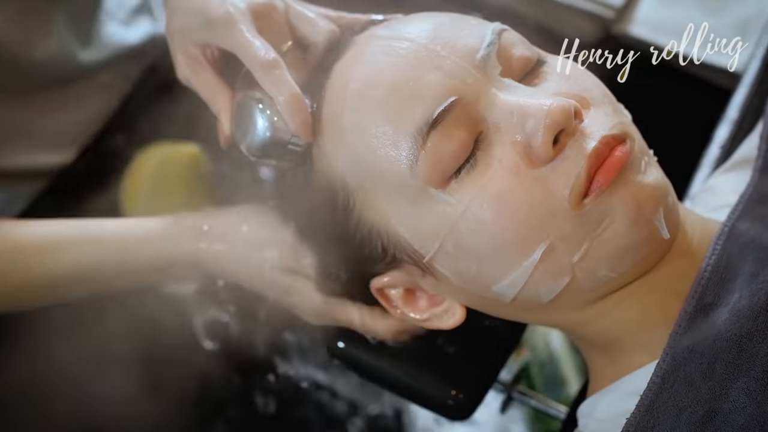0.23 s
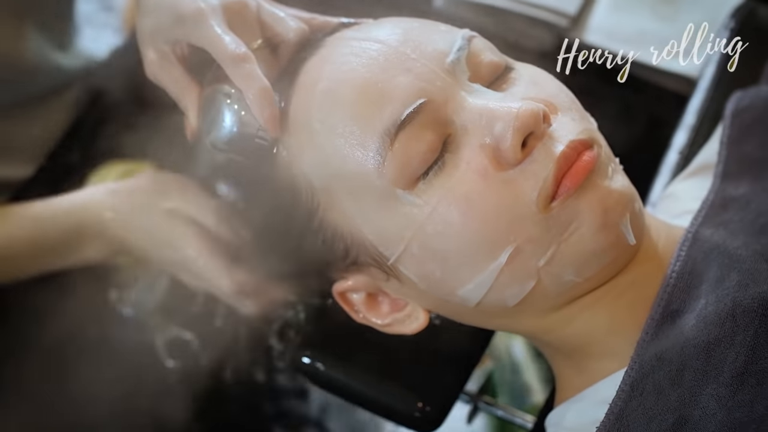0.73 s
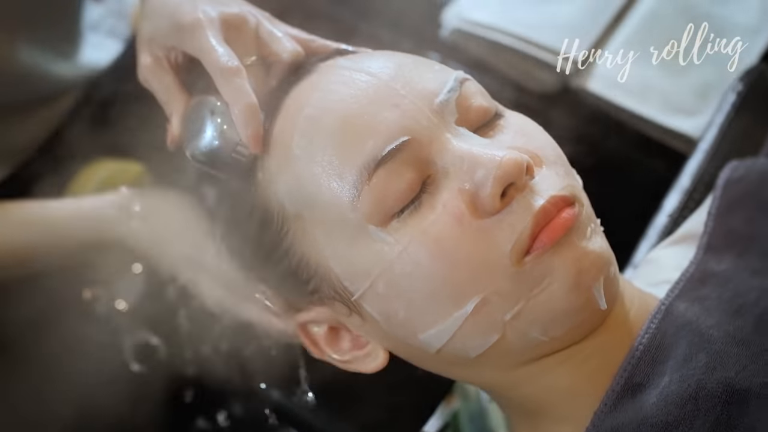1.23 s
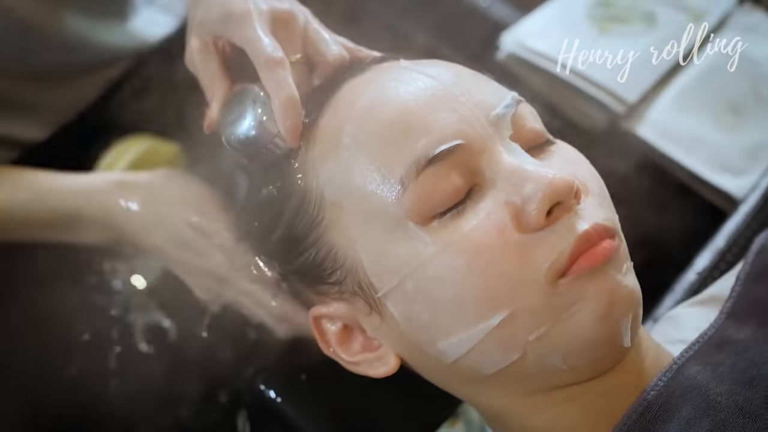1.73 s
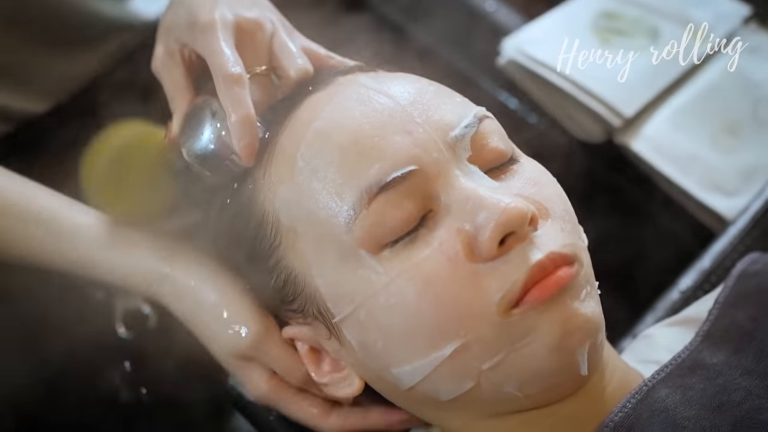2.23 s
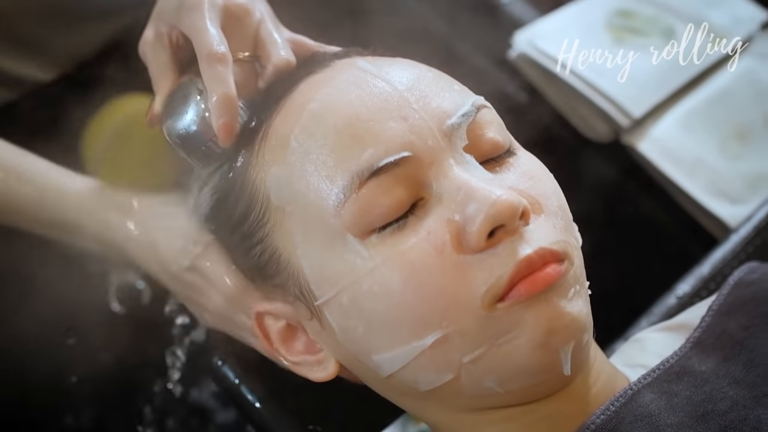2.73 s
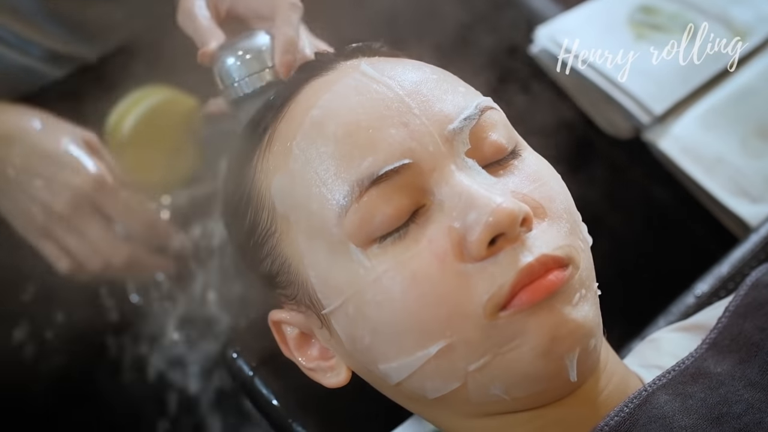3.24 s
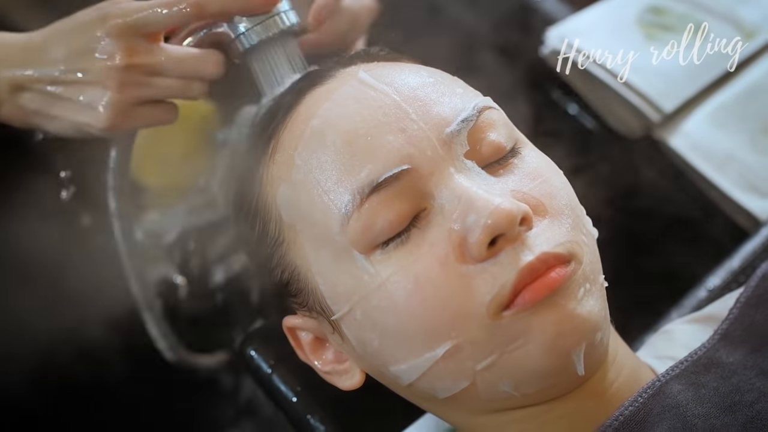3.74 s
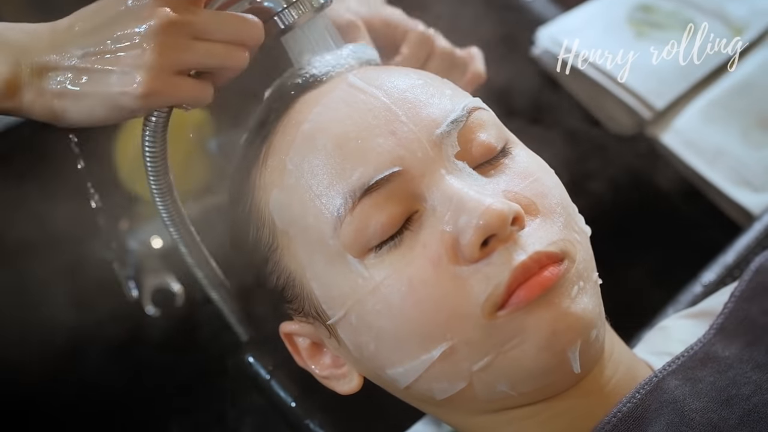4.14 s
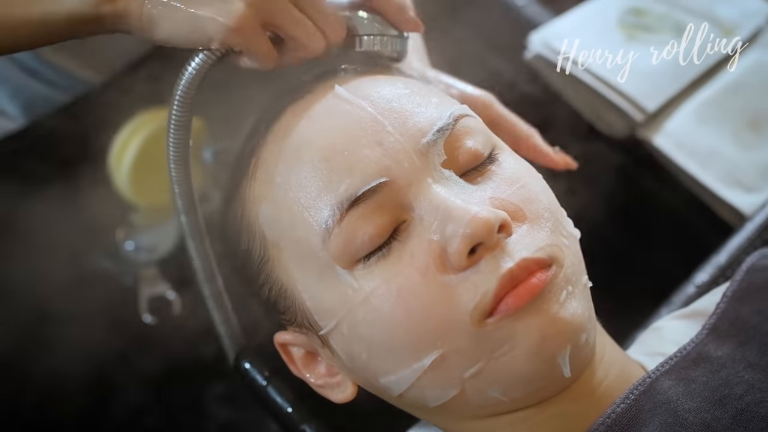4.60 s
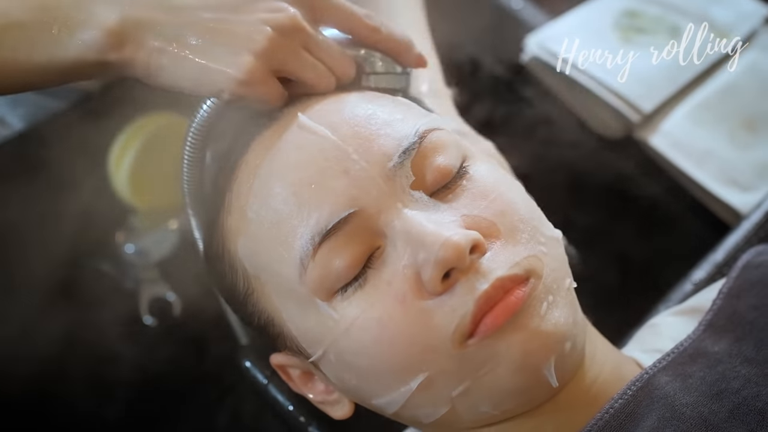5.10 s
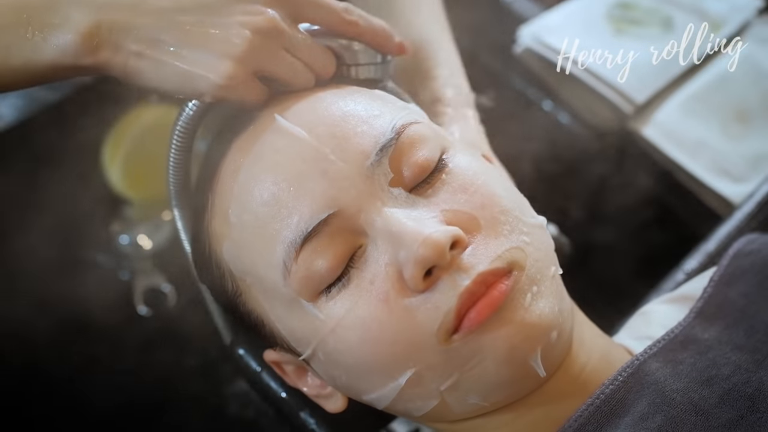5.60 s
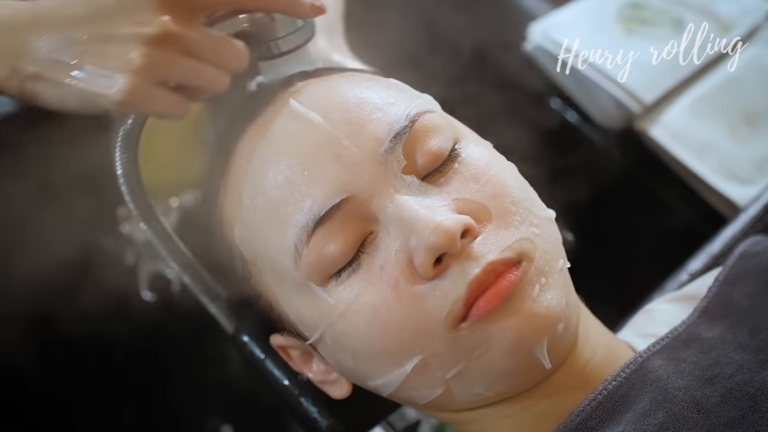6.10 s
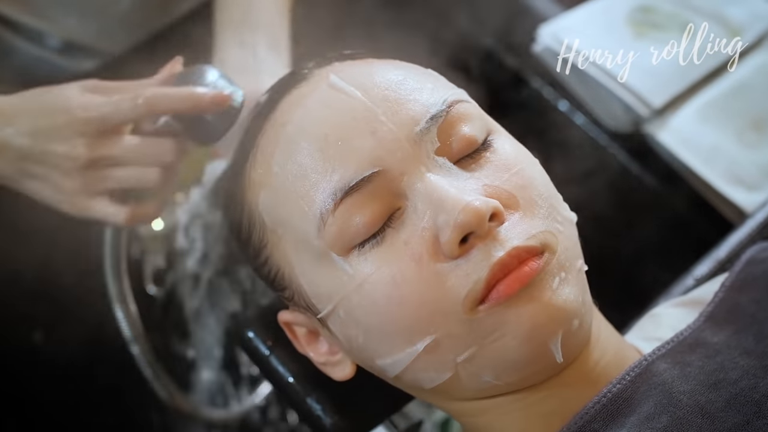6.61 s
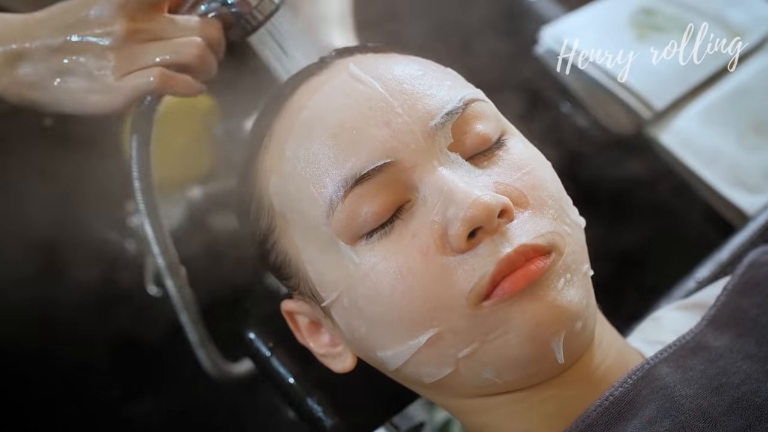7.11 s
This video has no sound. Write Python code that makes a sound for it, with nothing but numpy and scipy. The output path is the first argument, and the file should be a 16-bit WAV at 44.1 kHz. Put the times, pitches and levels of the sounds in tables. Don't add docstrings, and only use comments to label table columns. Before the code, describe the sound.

Close stereo, light bass, short hollow ceramic echo. From 0 to 2.7 s a shower head pressed to wet hair hisses softly; a hand scoops repeated splashes, with clumped trickles, tiny ticks and bright ringing drips. Run-off drums the bowl, and low watery slaps hit the drain around 0.5-0.8 and 1.55 s. From 2.8 s the head lifts, and by 3.3 s the spray is much louder, wide and misty, masking the trickle. A heavy plop falls near 3.75 s; bubbles fizz around 4.2 s and the rush peaks near 4.5 s. At 4.8-5 s it is smothered closer to the hair, flutters with a dip at 5.5 s, then surges with a wet squelch near 5.8 s. From 6.2 s it eases; strong gurgles and drops come at 6.5-7.1 s, and the spray swells again to the end at about 7.3 s.

```python
import sys
import numpy as np
from scipy import signal
from scipy.fft import rfft, irfft, next_fast_len
from scipy.io import wavfile
from scipy.ndimage import uniform_filter1d, map_coordinates

SR = 44100
rng = np.random.default_rng(int(sys.argv[2]) if len(sys.argv) > 2 else 0)


def put_to_file(sound):
    columns = np.atleast_2d(sound).T
    safe = np.clip(columns, -1, 1)
    whole_steps = np.round(safe * 32767)
    wavfile.write(sys.argv[1], SR, whole_steps.astype(np.int16))


def decibels_to_gain(level_db):
    exponent = np.asarray(level_db, float) / 20
    return 10 ** exponent


N = 324135
MIDDLE_DB = -28


def unit(x):
    return x / np.sqrt(np.mean(x ** 2) + 1e-20)


def along(points, hz):
    f, v = np.transpose(points)
    return np.interp(np.log(hz + 1), np.log(f + 1), v)


def curves(rows):
    s, *columns = np.transpose(rows)
    return [np.interp(np.arange(N) / SR, s, column) for column in columns]


def swells(rows, rise):
    t = np.arange(N) / SR
    total = 0
    for s, length, db in rows:
        corners = [s - rise * length, s, s + (1 - rise) * length]
        total = total + db * np.sin(np.interp(t, corners, [0, np.pi / 2, 0]))
    return total


def wobble(rate):
    knots = rng.standard_normal(int(N * rate / SR) + 4)
    return map_coordinates(knots, [np.arange(N) * rate / SR])


def filtered(x, response):
    m = next_fast_len(N + 8192)
    return irfft(rfft(x, m) * response(np.fft.rfftfreq(m, 1 / SR)), m)[..., :N]


def coloured(x, spectrum):
    return unit(filtered(x, lambda hz: decibels_to_gain(along(spectrum, hz))))


def patchy(x, depth_db, block):
    z = signal.stft(x, nperseg=block)[2]
    field = rng.standard_normal(z.shape[1:])
    field = uniform_filter1d(uniform_filter1d(field, size=5, axis=0), size=8, axis=1)
    return signal.istft(z * decibels_to_gain(depth_db * unit(field)), nperseg=block)[1][:, :N]


def patter(patchy_db, scatter_db):
    hits = rng.standard_normal((2, N)) * decibels_to_gain(scatter_db * rng.standard_normal(N))
    return patchy(hits, patchy_db, block=256)


def ringing(x, modes):
    def response(f):
        total = 0
        for k, (centre, width, db) in enumerate(modes):
            damping = 1j * f * width
            total = total + (-1) ** k * decibels_to_gain(db) * damping / (centre * centre - f * f + damping)
        return total
    return unit(filtered(x, response))


def bubbles(start, hz, size, cycles, rise, length):
    n = np.arange(length)
    turns = hz[:, None] * n / SR
    wave = np.sin(2 * np.pi * turns * (1 + rise * turns / cycles))
    wave = wave * np.exp(-turns / cycles) * (1 - np.exp(-turns))
    at = np.round(start * SR).astype(int)[:, None] + n
    return np.bincount(at.ravel(), (size[:, None] * wave).ravel(), N + length)[:N]


def bursts(s, db, t60):
    n = np.arange(SR // 100)
    puff = rng.standard_normal((len(s), len(n))) * decibels_to_gain(db[:, None] - 60 * n / SR / t60)
    at = np.round(s * SR).astype(int)[:, None] + n
    return np.bincount(at.ravel(), puff.ravel(), N)[:N]


# frequency in Hz, left-right likeness from 0 to 1.
ALIKE = [(60, 0.85), (150, .998), (400, 1), (950, 0.98), (2400, 1), (6000, 0.96), (15000, 0.59)]


def spread(pair):
    turn = lambda hz: np.arccos(np.clip(along(ALIKE, hz), -1, 1)) / 2
    mid, side = filtered(pair, lambda hz: np.array([np.cos(turn(hz)), np.sin(turn(hz))]))
    return np.array([mid + side, mid - side])


# share of the notch pitch, width in Hz.
HOLLOW = [(1, 260), (1, 500), (1.02, 200)]
# time in seconds, notch in Hz, share of spray caught from 0 to 1.
CUPPED = [(0, 2750, 0.8), (.2, 2680, 0.4), (.35, 2780, .8), (.45, 2850, .98), (.58, 2860, .98),
          (.66, 2950, 0.53), (.8, 2820, 0.25), (.95, 2900, 1), (1.15, 2750, 0.9), (1.25, 2900, 0.2),
          (1.45, 2750, 0.9), (2.02, 2870, 0.8), (2.14, 3300, 0.2), (2.22, 2890, 0.1), (3.498, 2630, 0),
          (3.68, 2150, 0.1), (3.75, 2270, 0.12), (4.78, 3280, 0.19), (4.86, 3050, 0.3), (4.96, 2700, 0.8),
          (5.03, 2470, 0), (5.08, 3330, 0.4), (5.19, 3160, 0.4), (5.25, 2030, 0.3), (5.36, 3020, 0),
          (5.48, 3240, 0.1), (5.52, 3180, 0), (5.7, 3270, 0.4), (5.82, 3360, 0.44), (5.95, 3200, 0),
          (6.4, 2880, 0), (6.8, 3180, 0), (6.95, 3200, 0), (7.1, 3000, 0.3), (7.35, 2840, 0)]
# peak time in seconds, length in seconds, level
# change in dB.
COVERS = [(.12, 0.13, 0), (.35, 0.11, 1.5), (.95, .06, -0.5), (1.13, 0.26, 2), (1.45, 0.088, 2),
          (2.05, 0.76, 1.5), (2.23, 0.043, -2), (2.47, 0.078, -2), (4.8, 0.08, -2), (4.86, 0.066, -2.5),
          (5.05, 0.05, -1.5), (5.49, 0.25, -5), (5.69, 0.13, -1), (6.0, 0.081, 1)]
COVER_CLOSE = 0.88


def hollowed(x):
    f, t, z = signal.stft(x, SR, nperseg=1024)
    s, notch_hz, _ = np.transpose(CUPPED)
    pitch, f = np.interp(t, s, notch_hz), f[:, None]
    cover_db = np.interp(t, np.arange(N) / SR, swells(COVERS, COVER_CLOSE))
    wider = 1 + 0.75 * np.abs(cover_db)
    for share, width in HOLLOW:
        detuning = (share * pitch) ** 2 - f * f
        z = z * detuning / (detuning + 1j * f * width * wider + 1)
    return signal.istft(z, SR, nperseg=1024)[1][..., :N]


def trickle(count):
    clump = np.cumsum(decibels_to_gain(6 * wobble(25)))
    pair = []
    for rows in rng.random((2, count, 4)):
        when, pitch, rarity, life = rows.T
        start = np.interp(when, clump / clump[-1], np.arange(N) / SR)
        size = (1 - .99 * rarity) ** -.55
        cycles = (2.5 + 9 * life ** 2.5)[:, None]
        pair.append(bubbles(start, 3400 * 2.06 ** pitch, size, cycles, rise=0.008, length=450))
    return unit(np.array(pair))


# time in seconds, spray level in dB.
SPRAY = [(0, -41.5), (.72, -40), (1.2, -33), (1.65, -34.5), (1.96, -37), (2.68, -34.5), (2.88, -30.5),
         (3.28, -22.5), (3.68, -23.5), (3.76, -20.5), (4.09, -21.5), (4.5, -17.5), (4.75, -19),
         (4.9, -24.5), (5.85, -18), (6.49, -25), (6.88, -25), (7.25, -17.5)]
# time in seconds, jets toward the microphone in dB, jets onto ceramic in dB.
AIM = [(0, -4, 3), (2.68, -4, 3), (2.95, -4, 7), (3.15, 4, 2), (3.3, 4, 1.5), (3.62, 5, -1), (3.88, 5, 3.5),
       (4.08, 2, 4), (4.35, 4.5, -0.5), (4.74, -2, 1), (4.82, -3, -1.5), (5.3, -3, -2), (5.7, 0.5, -0.5),
       (5.83, -3, -1.5), (5.98, 1, -7), (6.25, -2, 1), (6.65, -2, 4.5), (7.05, -0.5, -4), (7.35, 3.5, -1.5)]
# peak time in seconds, length in seconds, splash in dB.
SPLASHES = [(.01, 0.14, 15), (.2, 0.16, 15), (.45, 0.34, 12), (.65, 0.11, 13.5), (.7, 0.074, 0),
            (.78, 0.16, 15.5), (.83, 0.099, 4), (.89, 0.1, 11.5), (1.21, 0.11, 8), (1.33, .12, 6.5),
            (1.56, 0.28, 6.5), (2.18, 0.12, 6.5), (2.25, 0.47, 3), (2.52, 0.12, 5.5), (2.86, 0.36, 4),
            (3.75, 0.096, 3.5), (4.22, 0.32, 1), (4.6, 0.34, 0), (5.1, .08, 3), (5.24, 0.35, 3.5),
            (5.55, 0.11, 3.5), (5.84, 0.33, 4.5), (4.97, 0.15, 3.5), (5.35, 0.071, 2), (6.07, 0.25, 5),
            (6.53, 0.17, 2.5), (7.0, 0.096, 3)]
# frequency in Hz, density in dB per Hz.
HISS = [(2400, -62), (2750, -38), (3050, -9), (3400, -35), (3900, -3), (5000, -1), (6000, -1.5), (7300, -5),
        (9000, -16), (10500, -41), (12000, -60)]
BODY = [(900, -41), (1300, -7), (2000, -1), (2400, 3.5), (3000, 4.5), (3500, 4), (4500, -4), (5500, -50)]
MIST = [(7500, -21), (9000, 5), (10000, 1), (11700, -1.5), (13800, -6), (15600, -12.5), (18000, -30)]


def spray():
    (level_db,), (aim_db, bare_db) = curves(SPRAY), curves(AIM)
    over_db = level_db - MIDDLE_DB
    splash_db, cover_db = swells(SPLASHES, rise=0.33), swells(COVERS, COVER_CLOSE)
    hiss_db = level_db + 0.47 * splash_db + cover_db
    body_db = -39 + 1.27 * over_db + bare_db + splash_db + 1.07 * cover_db
    mist_db = -52.5 + over_db + aim_db + 0.78 * splash_db + 2 * cover_db
    flutter_db = 0.45 * wobble(30) + 0.6 * wobble(60)

    share = 0.056 + 0.35 / (1 + decibels_to_gain(12.5 * (hiss_db + 24.5)))
    jets = coloured(patter(patchy_db=2, scatter_db=2), HISS)
    hiss = decibels_to_gain(hiss_db + 1.0) * (np.sqrt(1 - share) * jets + np.sqrt(share) * trickle(count=4500))
    body_db = body_db + 4.0
    body = decibels_to_gain(body_db) * coloured(patter(patchy_db=2, scatter_db=1.5), BODY)
    mist_db = mist_db + 7.5 + 5 * share * wobble(55)
    mist = decibels_to_gain(mist_db) * coloured(patter(patchy_db=-0.5, scatter_db=5), MIST)

    strong = 1 / (1 + decibels_to_gain(4 * (-40 - (body_db - 4.0))))
    clear = np.clip(1 - curves(CUPPED)[1], 0, 1) * strong
    return decibels_to_gain(flutter_db) * (hollowed(hiss + (1 - clear) * body) + clear * body + mist)


# time in seconds, flow in dB.
RUNOFF = [(0, -0.5), (.3, 1), (.6, -1), (.8, 1.5), (1.7, 2), (1.86, -0.5), (2.03, 3.5), (2.4, 0.5),
          (3.25, 4), (3.9, 1), (4.67, -1.5), (5.26, 1.5), (5.87, -2), (6.65, 0.5), (7.04, -1), (7.35, -0.5)]
# peak time in seconds, length in seconds, swell in dB.
SLOSHES = [(0.02, 0.56, 8.5), (.3, 0.35, 2.5), (.67, 0.13, 8.5), (1.2, 0.18, 5.5), (1.65, 0.3, 2.5),
           (1.96, 0.075, 2), (2.41, 1, 4.5), (3.3, .6, 7), (4.6, 0.24, 1.5), (5.12, 0.096, 6),
           (6.65, 1, 2.5), (7.33, 0.42, 6.5)]
# peak time in seconds, length in seconds, change in dB.
SHEETS = [
    (1.3, 0.7, -1),
    (2.8, .4, 0.5),
    (4.2, .5, 1),
    (5.0, 0.38, 0),
    (5.7, 0.7, -2.5),
    (6.3, .5, -1),
    (6.7, 0.26, -2),
    (7.25, 0.24, 0),
]
# start in seconds, peak in dB,
# pitch in Hz.
SLUGS = [(0.489, -17, 433), (0.626, -8, 283), (0.648, -8, 705), (0.669, -11, 644), (0.689, -11, 645),
         (0.798, -21, 283), (1.539, -13.5, 497), (1.569, -16, 540), (2.877, -11.5, 340),
         (3.335, -12.5, 246), (3.598, -19, 297), (6.597, -17.5, 294), (6.859, -13, 880),
         (0.268, -16, 353), (0.621, -17, 283), (0.727, -17, 640), (0.812, -23, 256), (0.951, -29, 261),
         (1.111, -28, 256), (1.512, -26, 288), (2.291, -23, 285), (3.012, -23, 646), (3.245, -17, 278),
         (4.477, -20, 342), (4.816, -32, 342), (4.929, -24, 310), (5.119, -19, 600), (5.267, -27, 264),
         (5.476, -29, 404), (5.883, -27, 310), (6.597, -20, 291)]
# frequency in Hz, width in Hz, level in dB.
BOWL = [(894.2, 33, -8), (958, 25.5, 3), (997.7, 35.6, 3), (1040.8, 28, 3.5), (1076.5, 21.7, 4),
        (1130.4, 74, -5)]
PIPE = [(190.2, 8.9, -9), (235.5, 11.5, -2), (251.4, 10, 3.5), (283, 18.2, 2), (340, 14.4, 3.5),
        (356.5, 15, 4.5), (433, 48.4, -7)]
RIM = [(1519, 98, 0), (1705, 33, 8.5), (1765, 54.4, 1), (2160, 130, -6.5), (2350, 57, -1),
       (2590, 110, -9.5)]
POOL = [(536, 43, 3.8), (564.3, 25, 13.6), (643, 38, 5.6)]


def basin():
    flow_db, over_db = curves(RUNOFF)[0], curves(SPRAY)[0] - MIDDLE_DB
    bowl_db = -30 + 0.23 * flow_db + 0.079 * swells(GULPS + FIZZES, rise=0.55)
    pipe_db = -37 + flow_db
    rim_db = -32.5 + 0.25 * over_db + 0.11 * swells(FIZZES, rise=0.78) + swells(SHEETS, rise=0.38)
    pool_db = -43 + swells(SLOSHES, rise=0.28)
    out = 0
    for level_db, modes in ((bowl_db, BOWL), (pipe_db, PIPE), (rim_db, RIM), (pool_db, POOL)):
        broad = [(hz, 3 * width, 0) for hz, width, db in modes]
        feed = ringing(patter(patchy_db=1.2, scatter_db=2.0), broad)
        level_db = level_db + 0.26 + 0.49 * wobble(25) + 0.14 * wobble(3.37)
        out = out + decibels_to_gain(level_db) * ringing(feed, modes)
    out = patchy(out, depth_db=2, block=2048)
    s, db, hz = np.transpose(SLUGS)
    out[0] += bubbles(s, hz, decibels_to_gain(db + 0.5), cycles=1.54, rise=0.028, length=3000)
    return out


# peak time in seconds, length in seconds, swell in dB.
GULPS = [(.01, 0.13, 6), (.3, 0.95, 8.5), (0.647, 0.16, 11), (1.995, .4, 8), (2.537, 0.15, 12),
         (2.906, 0.34, -3), (3.55, 0.95, 9), (4.253, 1, 8.5), (4.85, 0.34, -10), (5.51, 0.28, 14),
         (5.82, 0.27, 1), (1.3, 0.33, -3), (2.05, .12, -6), (6.165, 0.28, 19), (6.64, 0.5, 13),
         (6.898, 0.27, 23.5), (7.34, 0.09, 1)]
FIZZES = [(0.243, 0.98, 5), (0.854, 0.16, 14.5), (1.21, 0.27, 11), (2.1, 0.43, 7), (2.485, 0.42, 10),
          (4.242, 0.54, 20.5), (4.8, 0.45, 1), (5.077, 0.34, 9), (6.1, 0.87, 4), (6.655, 0.36, 14),
          (6.953, 0.27, 26), (7.09, 0.19, 28), (7.3, 0.24, -15)]
# peak time in seconds, length in seconds, swell in dB.
SQUELCHES = [
    (3.3, .5, 10),
    (3.76, .1, 16),
    (4.2, .5, 14),
    (4.6, .2, 10),
    (5.25, .2, 8),
    (5.827, 0.14, 25),
    (6.1, .3, 8),
    (6.53, .15, 12),
    (7.2, .3, 10),
]


def gurgle(count):
    gulp_db = -52.5 + swells(GULPS, rise=0.56)
    fizz_db = -55.5 + swells(FIZZES, rise=0.64)
    squelch_db = -58.5 + swells(SQUELCHES, rise=0.32)
    out = 0
    for level_db, low_hz in ((gulp_db, 690), (fizz_db, 1220), (squelch_db, 2100)):
        pops = []
        for when, pitch, size in rng.random((2, 3, count)):
            pops.append(bubbles(when * N / SR, low_hz * 1.4 ** pitch, 0.9 + size, cycles=9, rise=0.03, length=800))
        out = out + decibels_to_gain(level_db + 1.5) * unit(np.array(pops))
    return out


# start in seconds, peak in dB, pitch in Hz.
SPECKS = [(0.0864, -24, 4510), (0.166, -16, 4550), (0.2314, -18, 4300), (0.2744, -22, 4480),
          (0.323, -15, 4190), (0.4464, -20, 5420), (0.469, -14, 5400), (0.586, -17, 7090),
          (0.6674, -27, 4100), (0.7804, -16, 4610), (0.8114, -17, 5050), (0.942, -12, 6060),
          (0.9712, -24, 5540), (0.9904, -29, 6190), (1.0091, -20, 5130), (1.0314, -13, 4970),
          (1.1243, -17, 4370), (1.163, -18, 4310), (1.4234, -25, 5040), (1.498, -12, 3940),
          (1.6164, -15, 6990), (1.7978, -21, 4590), (1.8354, -16, 5990), (1.8886, -13, 5570),
          (1.9874, -30, 4840), (2.0124, -26, 5240), (2.08, -19, 6200), (2.11, -15, 7760),
          (2.141, -15, 6360), (2.166, -20, 5300), (2.2345, -19, 3930), (2.2794, -18, 5200),
          (2.384, -13, 5040), (2.4634, -25, 4390), (2.7284, -20, 5240), (2.785, -20, 5100),
          (4.812, -8, 6600), (5.5029, -8, 4100), (5.6471, -5, 6320), (6.5144, -7, 4200), (6.558, -7, 4300),
          (6.6185, -5, 4100), (6.6564, -11, 3900)]
# start in seconds, peak in dB.
SPITS = [(0.0812, -57), (0.0812, -48), (0.1381, -45), (0.1655, -45), (0.191, -40), (0.2299, -40),
         (0.3047, -48), (0.3436, -51), (0.3985, -44), (0.4359, -48), (0.4489, -47), (0.5447, -50),
         (0.5447, -47), (0.5861, -39), (0.7337, -51), (0.7701, -30), (0.8121, -41), (0.8275, -35),
         (0.8565, -34), (0.8674, -37), (0.8869, -32), (0.9193, -41), (0.9842, -47), (1.1288, -47),
         (1.1513, -42), (1.1623, -42), (1.2376, -47), (1.3049, -40), (1.3209, -39), (1.4262, -45),
         (1.5643, -43), (1.6162, -42), (1.702, -44), (1.7345, -46), (1.7828, -53), (1.7958, -49),
         (1.8657, -49), (1.8876, -49), (1.9185, -45), (1.9909, -50), (2.0033, -44), (2.0123, -36),
         (2.0971, -48), (2.144, -39), (2.168, -31), (2.2463, -38), (2.2618, -34), (2.3176, -47),
         (2.4768, -47), (2.6589, -51), (2.6843, -49), (2.7287, -49), (2.7811, -47), (2.8809, -40),
         (2.9711, -33), (3.1394, -26), (3.2794, -24), (3.3294, -26), (4.812, -25), (5.2024, -21),
              (5.3961, -29), (5.5009, -24), (5.863, -23), (6.5685, -25), (6.8498, -26), (7.2194, -18)]
# frequency in Hz, density in dB per Hz.
SPIT = [(4000, -30), (6500, -2), (9000, 3), (12500, -4), (16000, -14)]


def specks():
    s, db, hz = np.transpose(SPECKS)
    ring = bubbles(s, hz, decibels_to_gain(db - 5.5), cycles=9.7, rise=0.0034, length=300)
    ring = ring + filtered(bursts(s, db, t60=0.016), lambda f: decibels_to_gain(along(HISS, f)))
    s, db = np.transpose(SPITS)
    spits = [filtered(bursts(s, db + 1, t60=.035), lambda f: decibels_to_gain(along(SPIT, f))) for side in (0, 1)]
    return ring * np.array([[1], [0]]) + spits


# start in seconds, peak
# in dB, pitch in Hz, smaller bubble in dB.
SINGLE_DROPS = [(.1391, -30, 4200, -14), (0.1921, -2.5, 3810, -12), (.2104, -22, 4500, -14),
                (.2508, -13, 4300, -22), (0.29, -13.5, 4200, -18), (.306, -12.5, 5050, -11),
                (.3706, -24, 4770, -3), (0.409, -21, 6330, -12), (0.4377, -18, 6500, -7),
                (0.608, -10.5, 6100, -13), (.734, -16, 4300, -17), (0.776, -9, 4470, -18), (.829, -9, 4900, -12),
                (0.8647, -14.5, 4640, -15), (0.93, -16.5, 4900, -6), (1.074, -14, 4200, -9),
                (1.181, -15, 4260, -4), (1.3202, -13.5, 3970, -5), (1.39, -14, 5500, -19), (1.49, -7, 4520, -16),
                (1.5735, -18, 3900, -2), (1.649, -13, 5160, -17), (1.819, -10, 4930, -16), (1.89, -4.5, 5380, -32),
                (2.0426, -16.5, 5600, -7), (2.3275, -7.5, 3980, -28), (2.341, -7.5, 4770, -29),
                (2.3518, -8, 3960, -31), (2.4915, -17, 6060, -3), (2.544, -15.5, 4340, -24),
                (2.6544, -19, 4530, -5), (3.1014, -13, 5100, -13), (3.1842, -11, 4830, -8),
         (3.2362, -8.5, 4330, -10), (3.299, -5, 4500, -15), (3.402, -9, 4900, -14), (3.493, -9.5, 5850, -8),
         (3.7265, -6.5, 3090, -22), (3.7544, -3, 2080, -11), (4.5553, -2, 4940, -22), (4.595, -9, 4540, -2),
         (5.2035, -7.5, 5000, -1), (6.5002, -4, 4140, -26), (6.602, -3, 4470, -14), (6.6453, -4, 3630, -27),
         (6.8427, -11, 4500, -16)]


def drops():
    s, db, hz, small_db = np.transpose(SINGLE_DROPS)
    crack_db = db - 5 + 0.64 * small_db
    late = rng.random((len(s), 4))
    n = np.arange(SR // 200)
    burst = rng.standard_normal((len(s), len(n))) * decibels_to_gain(-60 * n / SR / 0.012)
    at = (np.round(s * SR).astype(int)[:, None] + n).ravel()
    crack = np.bincount(at, (decibels_to_gain(crack_db)[:, None] * burst).ravel(), N)[:N]
    out = np.tile(filtered(crack, lambda f: decibels_to_gain(15 + 1.14 * along(HISS, f))), (2, 1))

    partner_hz = 5700 + 1200 * late[:, 1]
    first_s, first_hz = s + 0.0042 + 0.015 * late[:, 0], hz * (0.9 + .3 * late[:, 1])
    second_s, second_hz = s + 0.0067 + 0.016 * late[:, 2], hz * (1.0 + 0.56 * late[:, 3])
    for side, lean_db in enumerate((-.5, .5)):
        size = decibels_to_gain(db + lean_db)
        partner = 1.05 * size * decibels_to_gain(small_db)
        out[side] += bubbles(s + 0.00031, partner_hz, partner, cycles=12.0, rise=0.017, length=300)
        out[side] += bubbles(s, hz, 1.2 * size, cycles=5.5, rise=0.01, length=400)
        out[side] += bubbles(first_s, first_hz, 0.3 * size, cycles=6, rise=0.01, length=400)
        out[side] += bubbles(second_s, second_hz, 0.25 * size, cycles=6, rise=.01, length=400)

    t = np.arange(SR // 10) / SR
    echo = rng.standard_normal(len(t)) * decibels_to_gain(-60 * t / 0.036) * (t > .0015)
    echo = echo / np.linalg.norm(echo)
    return out + decibels_to_gain(-9) * signal.fftconvolve(out, echo[None], axes=1)[:, :N]


# time in seconds, left minus right in dB.
LEAN = [(0.0, -1.0), (6.2, -1), (6.84, -0.5), (7.35, -1)]


def scene():
    lean_db, = curves(LEAN)
    rumble = coloured(rng.standard_normal((2, N)), [(20, 8.5), (80, 2.5), (130, -16.0), (180, -60)])
    rumble = decibels_to_gain(-39.0 + 9.7 * wobble(30)) * rumble
    inside = hollowed(spread(basin() + gurgle(count=1800) + specks()) + drops())
    return inside + spread(spray()) * decibels_to_gain([lean_db / 2, -lean_db / 2]) + spread(rumble)


def low_pass(x):
    return signal.sosfilt(signal.butter(12, 15760, fs=SR, output="sos"), x)


# frequency in Hz, gain in dB.
MIC = [(25, -58), (100, -46.5), (150, -5.5), (185, -8), (220, 1), (9600, -1), (9750, -4), (16000, -1.5)]
# frequency in Hz, phase in radians by which left leads.
LAG = [(1200, 0.13), (2500, -0.54), (3500, -0.47), (11000, -0.48), (15500, -.2)]


def record(dry):
    def ports(hz):
        lead = .5j * along(LAG, hz)
        return decibels_to_gain(along(MIC, hz)) * np.exp([lead, -lead])
    heard = filtered(dry, ports)
    heard = heard / (1 + np.abs(heard) ** 6) ** (1 / 6)
    heard = filtered(heard, lambda hz: hz < 15780)
    return low_pass(heard)


dry = scene()
out = record(dry)
put_to_file(out)
```